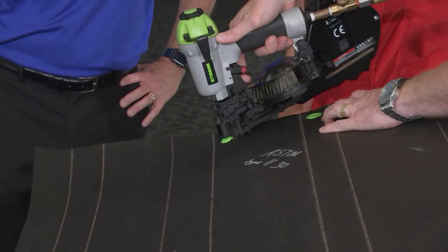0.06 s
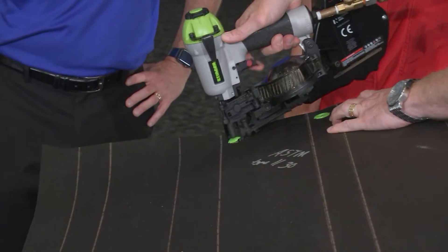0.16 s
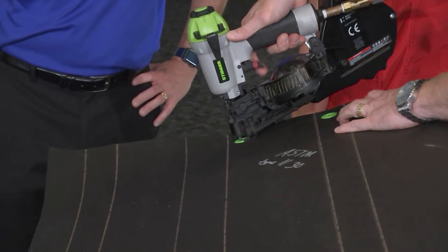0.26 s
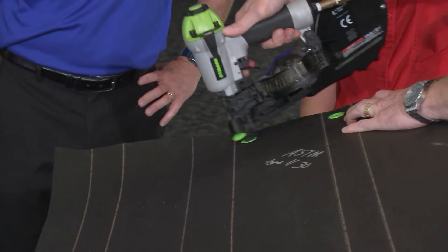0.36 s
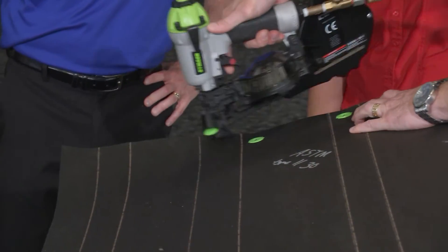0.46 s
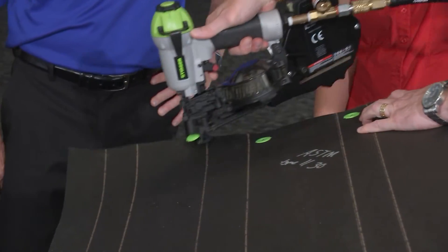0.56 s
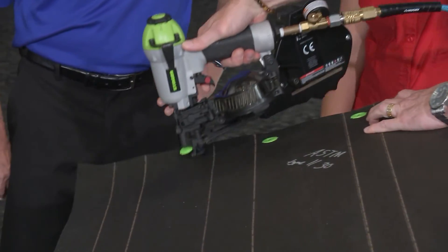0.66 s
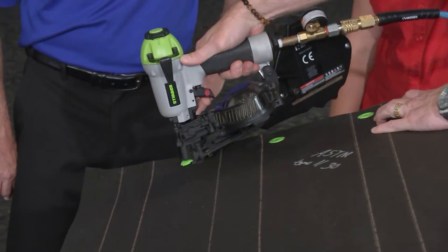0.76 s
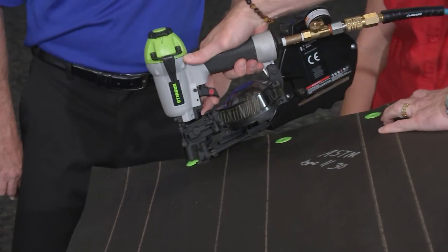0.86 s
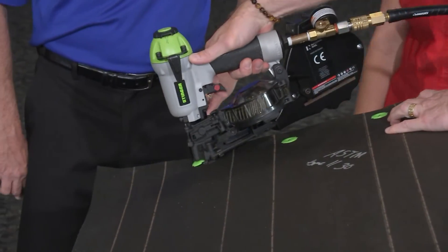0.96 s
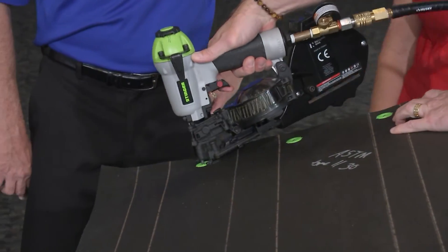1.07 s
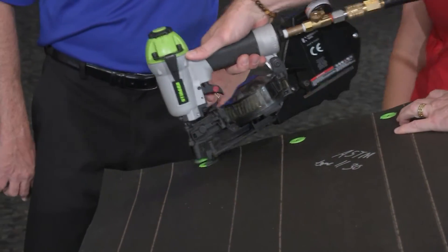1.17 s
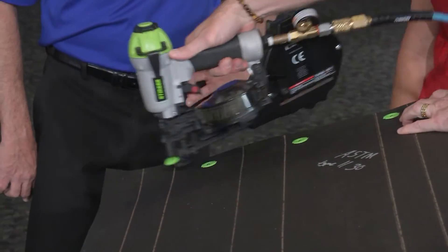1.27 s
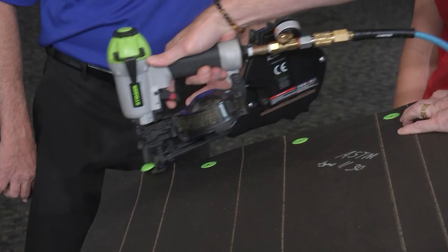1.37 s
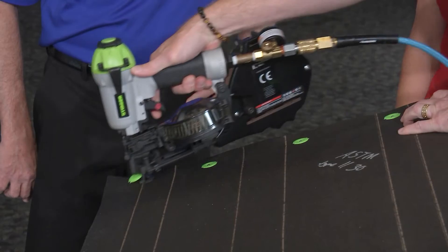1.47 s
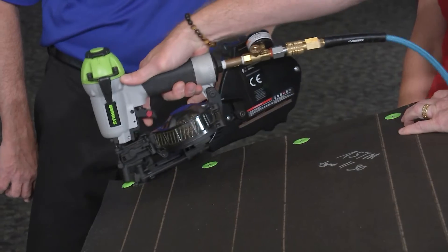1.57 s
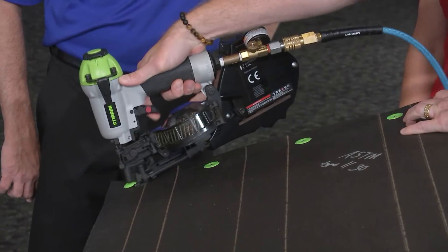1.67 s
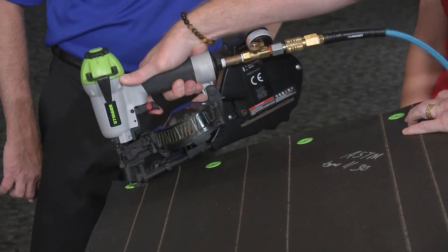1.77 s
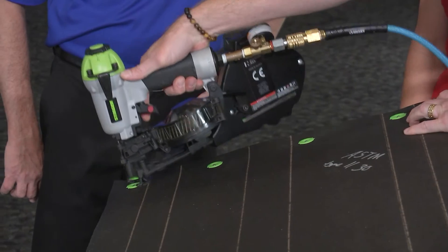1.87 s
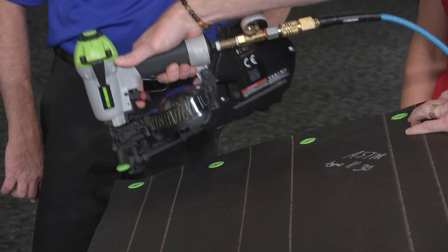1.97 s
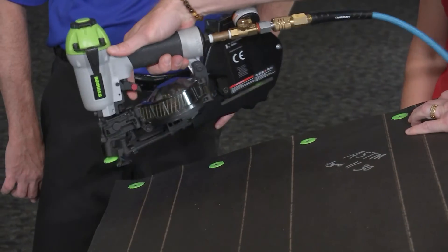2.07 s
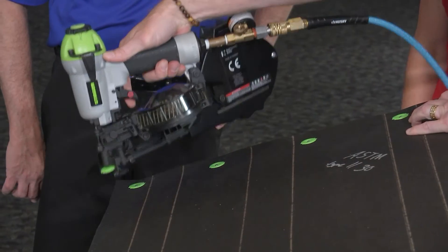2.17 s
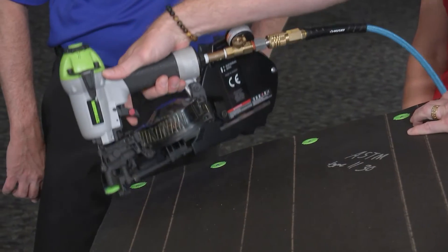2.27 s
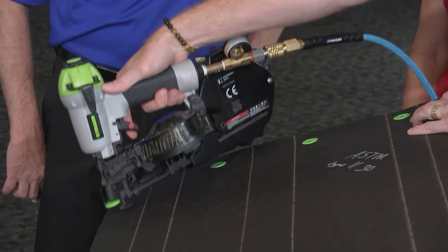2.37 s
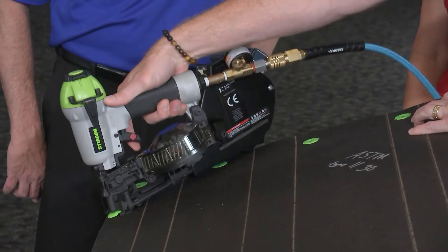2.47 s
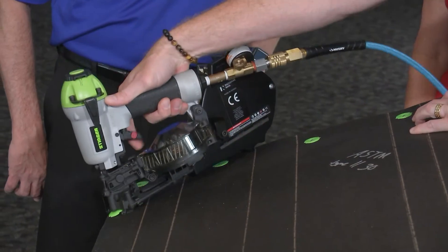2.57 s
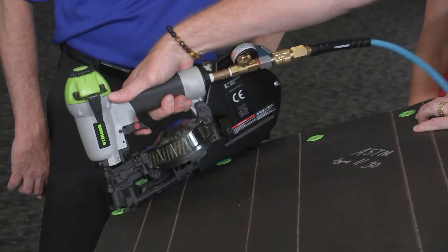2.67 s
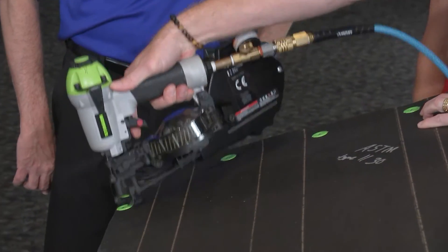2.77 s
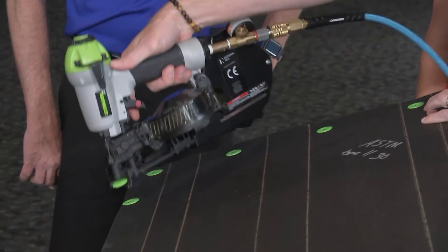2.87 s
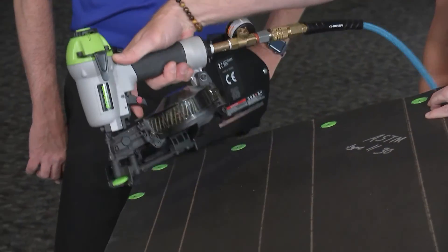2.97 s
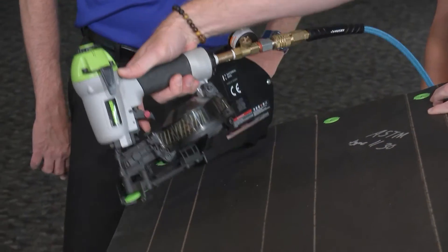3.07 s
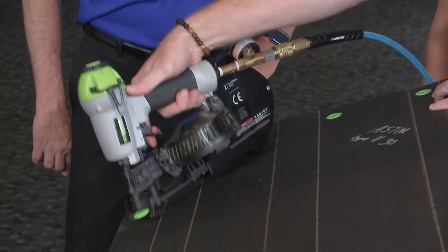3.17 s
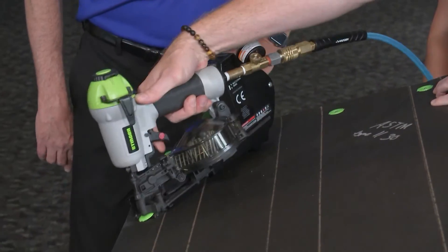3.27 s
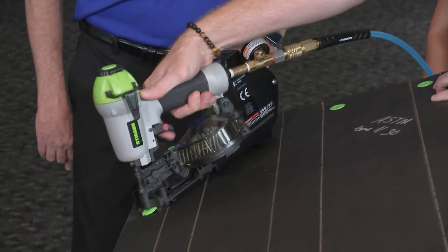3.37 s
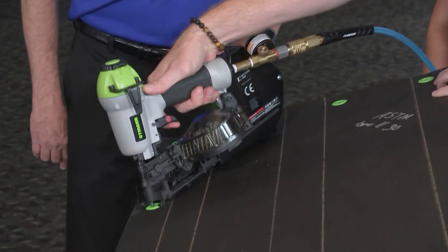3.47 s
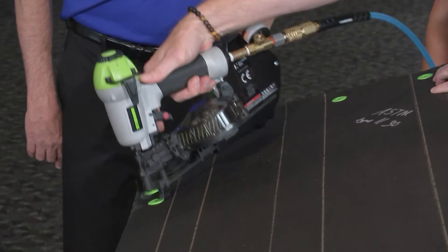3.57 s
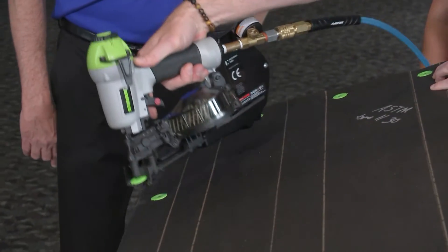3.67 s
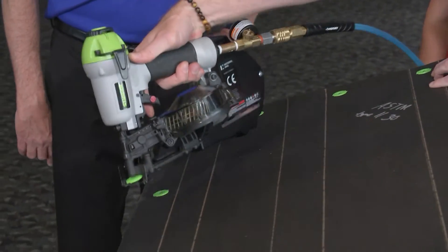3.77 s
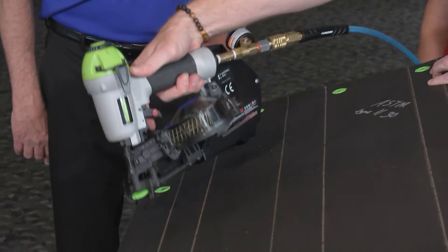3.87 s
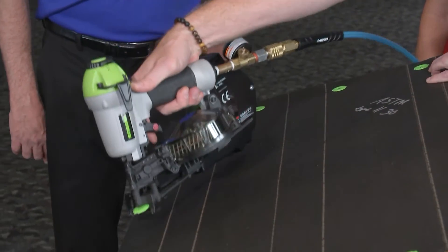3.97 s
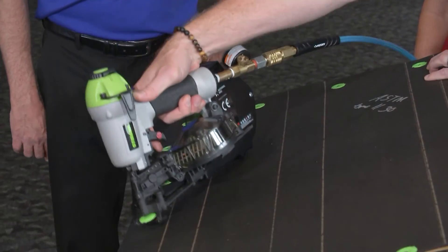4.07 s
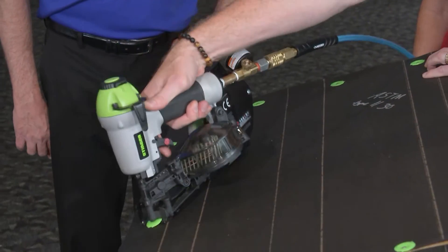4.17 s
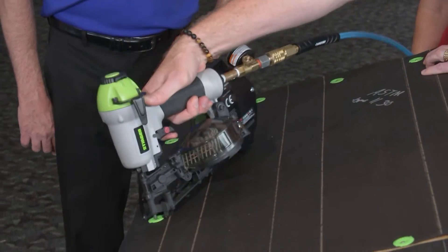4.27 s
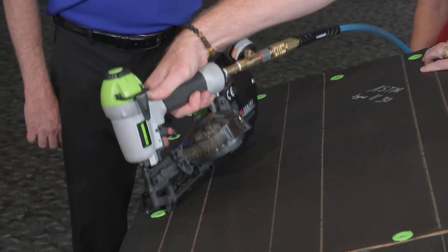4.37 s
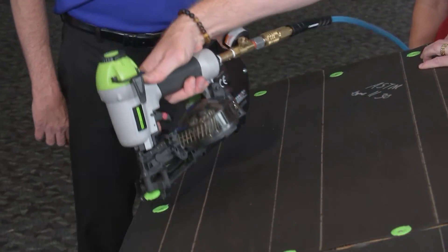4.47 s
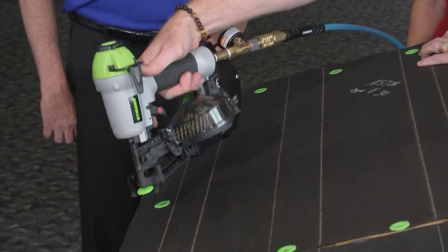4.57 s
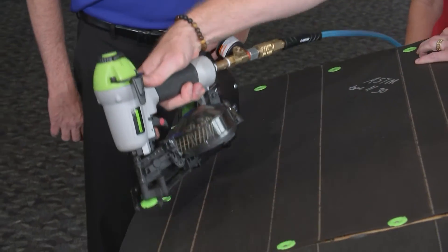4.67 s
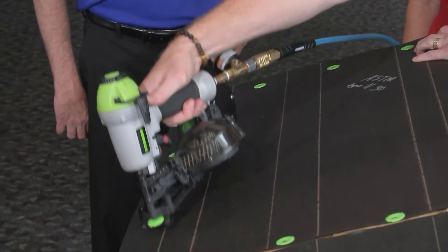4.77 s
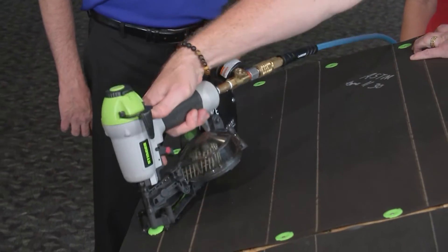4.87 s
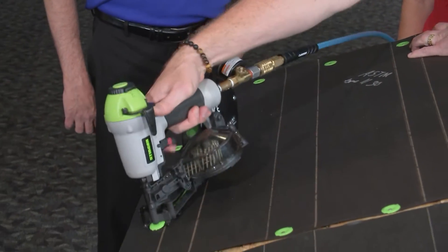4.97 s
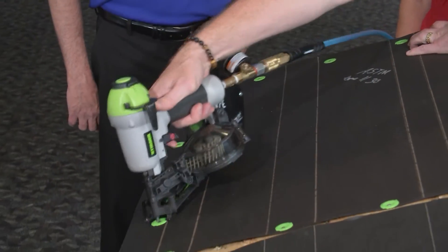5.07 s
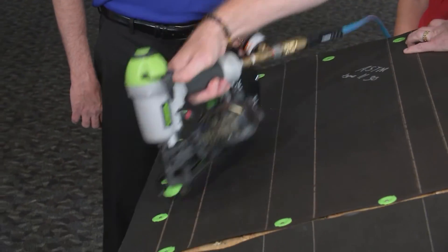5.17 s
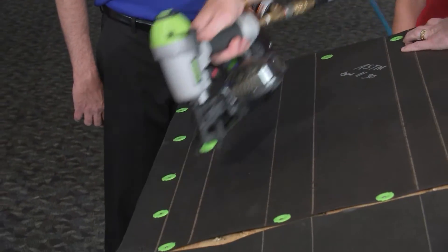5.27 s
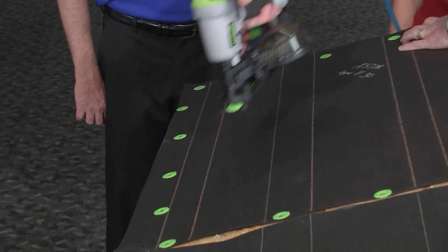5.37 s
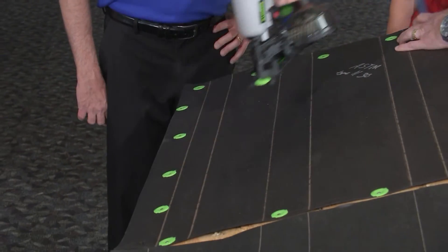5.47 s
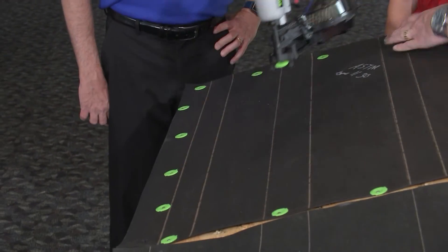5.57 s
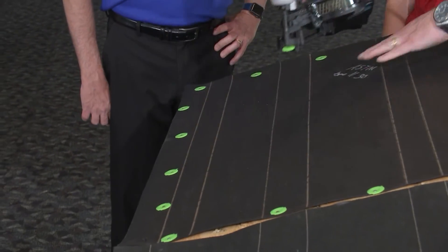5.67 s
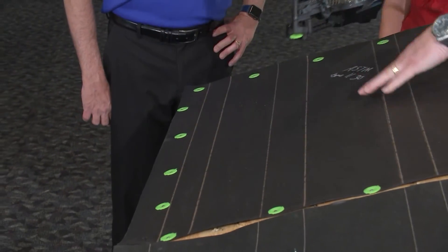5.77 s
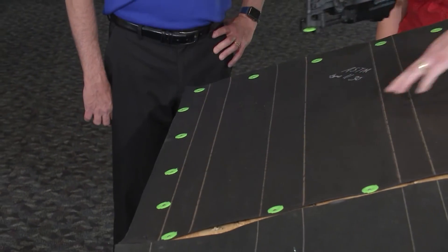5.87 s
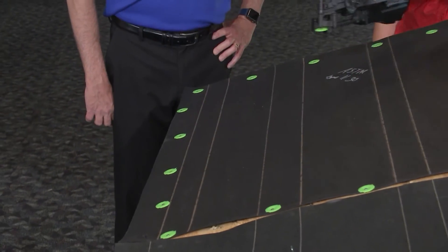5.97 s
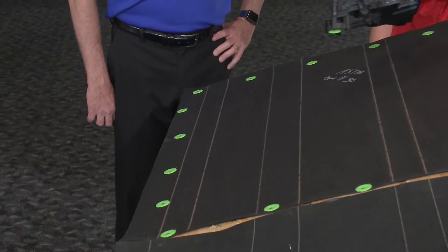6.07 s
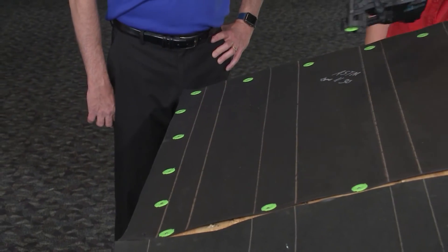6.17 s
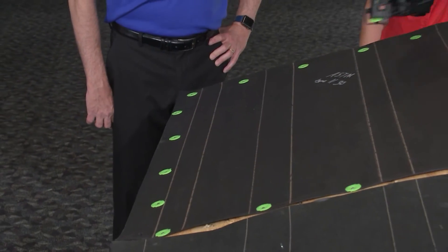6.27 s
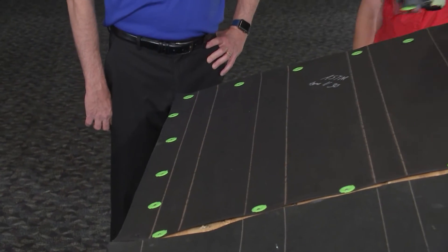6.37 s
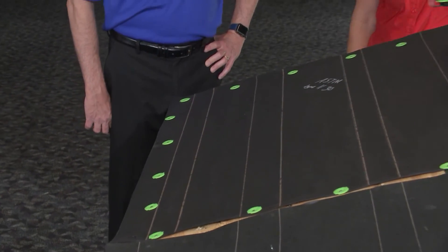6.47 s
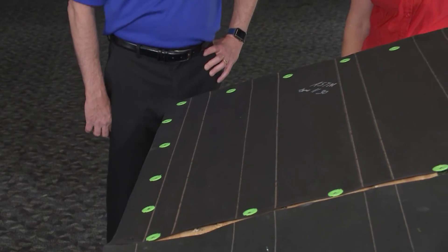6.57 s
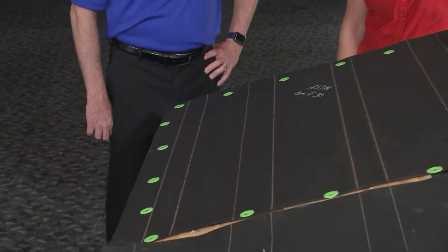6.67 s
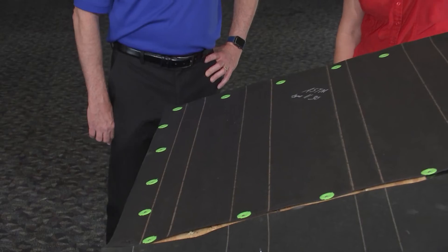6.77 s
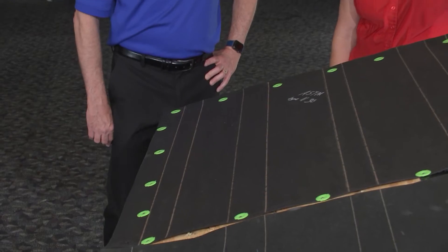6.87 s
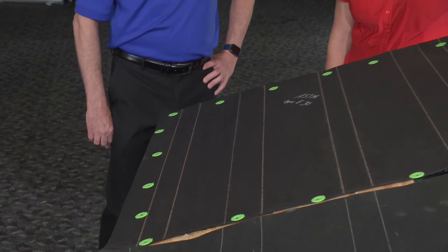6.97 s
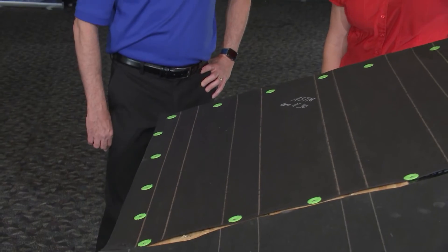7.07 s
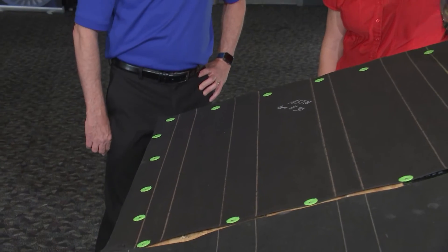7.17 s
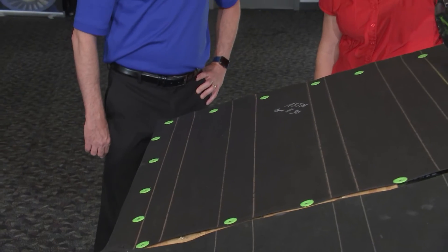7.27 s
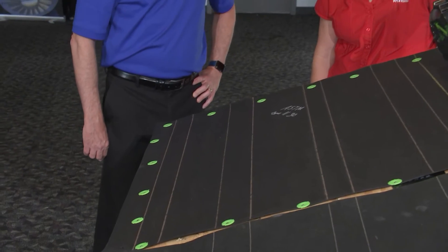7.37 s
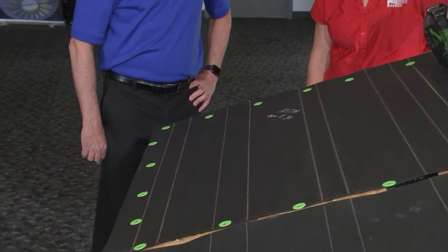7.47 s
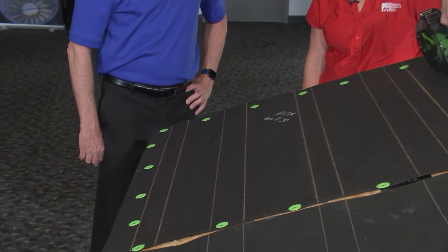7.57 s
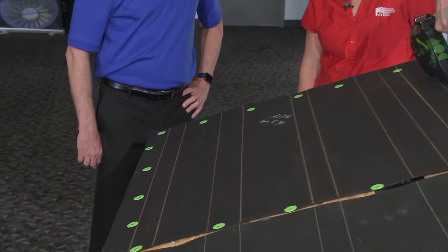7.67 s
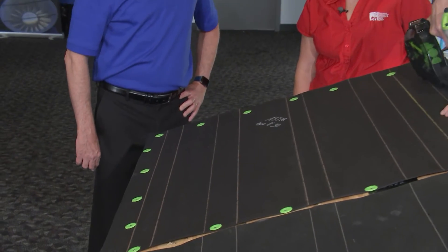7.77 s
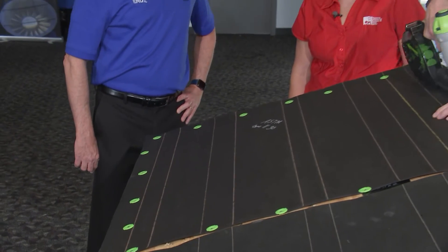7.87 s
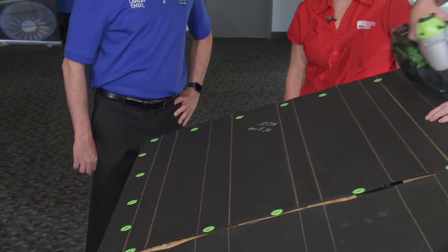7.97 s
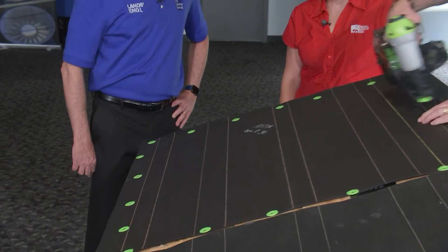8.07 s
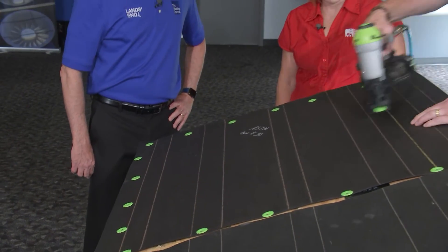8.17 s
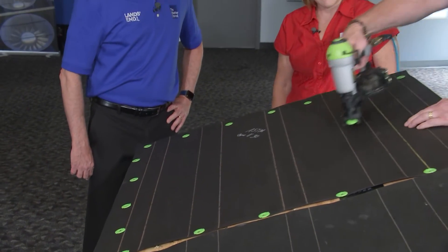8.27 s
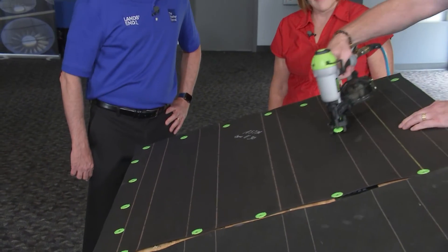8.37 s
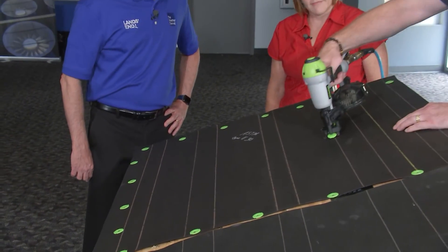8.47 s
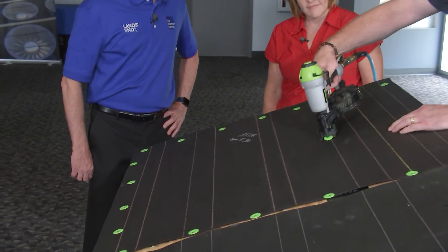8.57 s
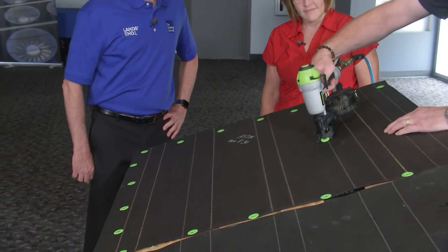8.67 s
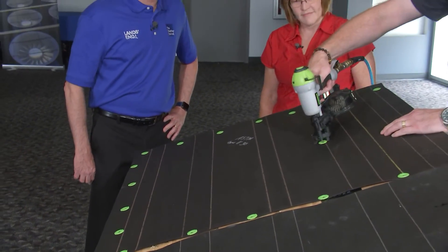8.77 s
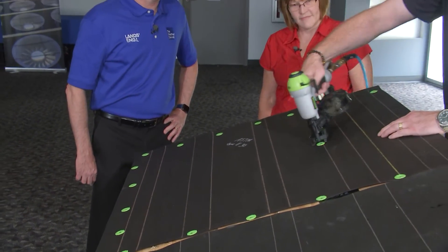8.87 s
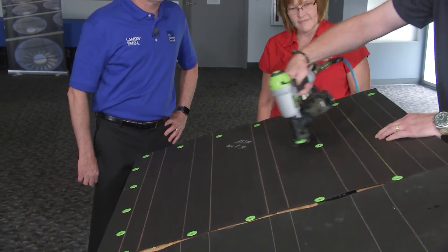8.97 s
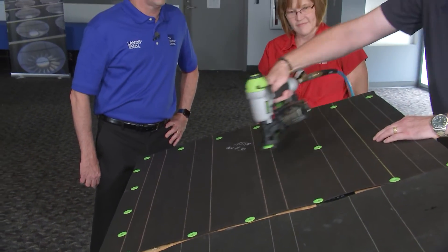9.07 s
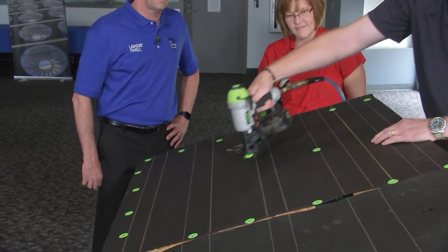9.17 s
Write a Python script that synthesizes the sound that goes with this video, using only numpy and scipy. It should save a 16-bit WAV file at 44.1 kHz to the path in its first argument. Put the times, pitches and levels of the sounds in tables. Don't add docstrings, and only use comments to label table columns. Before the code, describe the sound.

In an echoing hall, an air-powered nail gun knocks down, cracks out seven shots along a wooden sheet, pauses, then fires two more.

```python
import sys
import numpy as np
from scipy import signal
from scipy.fft import rfft, irfft
from scipy.io import wavfile
from scipy.ndimage import uniform_filter1d

SR = 44100
rng = np.random.default_rng(int(sys.argv[2]) if len(sys.argv) > 2 else 0)


def boost(x):
    u = np.asarray(x, float) / 20
    return 10 ** u


def master(y):
    cut = np.clip(np.atleast_2d(y).T, -1, 1)
    pcm = np.round(cut * 32767)
    wavfile.write(sys.argv[1], SR, pcm.astype(np.int16))


N = 407484

# pitch_hz, level_db per Hz
VENTILATION = [(14, -24), (36, -11), (65, -6.5), (97, -15.5), (134, -13.5), (228, -23.5), (703, -31.5),
               (1370, -40.5), (2100, -43), (2650, -52.5), (3400, -50), (5000, -57.5), (12000, -60.5),
               (13500, -83.5), (22000, -120)]

# start_s, knock_db, knock_hz, sheet_low_db, sheet_mid_db
LANDINGS = [(0.0, -32.5, 524, -27.5, -35), (.817, -30, 688, -38.5, -39.5), (.87, -41, 683, -42.5, -47),
            (1.629, -34, 532, -40.5, -47.5), (2.519, -31, 500, -32.5, -30), (4.147, -40.5, 523, -53, -39),
            (4.167, -31, 544, -37.5, -41), (4.207, -35, 463, -46, -40), (4.221, -35.5, 474, -40, -49),
            (4.245, -39, 463, -56, -53.5), (4.881, -35, 495, -29.5, -33), (4.893, -26, 595, -30.5, -33.5),
            (4.9075, -27.5, 575, -43.5, -43), (6.9435, -36, 558, -42, -46), (6.949, -36, 530, -44.5, -44.5),
            (7.021, -49, 480, -41, -45), (7.037, -48.5, 553, -53.5, -52.5), (7.697, -45, 525, -46, -60.5),
            (7.739, -37.5, 525, -58.5, -41), (8.802, -11.5, 519, -46, -20.5), (8.873, -28, 515, -54, -50)]
# start_s, knock_db, knock_hz
TAPS = [(0.704, -41, 648), (1.54, -47.5, 610), (2.397, -49, 557), (2.613, -38.5, 652), (3.196, -43, 523),
        (3.249, -44.5, 627), (3.3, -38.5, 540), (3.38, -39, 594), (4.992, -48.5, 511), (7.03, -47.5, 528),
        (7.366, -54.5, 554), (8.478, -46.5, 506), (8.645, -53.5, 510)]

# start_s, level_db, t60_s
LEVER = [(.0075, -40, 0.0099), (.022, -50, 0.018), (.029, -50, .02), (.054, -58, 0.016), (.065, -59, .015),
         (.806, -58, .02), (.888, -62, .02), (2.51, -46, .03), (2.628, -65, .012), (3.283, -42, 0.014),
         (3.317, -61, .015), (4.196, -42, .02), (4.862, -56, .02), (4.943, -56, .015), (5.015, -66, 0.014),
         (6.99, -58, .02), (7.03, -53, 0.018), (7.08, -67, .02), (.622, -52.5, .015), (.7864, -55.5, 0.022),
         (.799, -54, .02), (0.812, -40, 0.0083), (.8157, -32, 0.018), (.82, -46, .06), (.8409, -51, .02),
         (1.1176, -32.5, .02), (1.5385, -39, 0.026), (1.627, -38.5, 0.0085), (2.4746, -55, .022),
         (2.4802, -39, 0.019), (2.494, -42, 0.017), (3.2512, -35.5, 0.017), (3.26, -43, 0.027),
         (4.168, -35.5, .019), (4.175, -37, 0.023), (4.2453, -53.5, .02), (4.8688, -43.5, .026),
         (4.8746, -46.5, 0.064), (4.9329, -49, 0.018), (5.093, -37, .015), (5.58, -58, .03),
         (6.18, -74.5, .03), (6.35, -77.5, .06), (6.715, -72, .06), (6.745, -72, .06), (6.775, -74, .06),
         (6.87, -78, .04), (7.51, -72, .03), (6.9455, -38.5, 0.025), (6.949, -35.5, 0.022),
         (6.957, -45.5, .035), (7.0181, -64, .02), (7.446, -66.5, 0.017), (7.732, -56, 0.013),
         (8.497, -43.5, 0.03), (8.52, -54, 0.018), (8.7695, -36, 0.0065)]
# start_s, level_db, t60_s
COIL = [(.0019, -31.5, 0.019), (0.012, -32, 0.04), (0.052, -65, 0.026), (.109, -60.5, 0.02),
        (0.782, -45, 0.022), (.8671, -61, .018), (2.5178, -32, 0.017), (2.524, -47, .06), (2.533, -48, .04),
        (3.277, -43.5, 0.015), (3.2875, -47, 0.039), (3.3853, -45, 0.012), (4.156, -37.5, 0.03),
        (4.185, -45, .03), (4.1925, -43.5, 0.03), (4.201, -47, .02), (4.209, -35.5, 0.024),
        (4.2215, -44, .022), (4.865, -55, .025), (4.885, -45, 0.026), (4.89, -32, .018),
        (4.898, -30, 0.024), (4.905, -45, .02), (4.916, -38, .028), (4.993, -46, 0.022), (6.959, -48, 0.03),
        (7.047, -61, .015), (7.034, -50, 0.026), (7.039, -52, 0.025), (7.067, -53, 0.023),
        (7.3718, -51, .019), (7.6945, -50.5, 0.013), (7.702, -64, 0.022), (7.7388, -44, 0.012),
        (7.7446, -49, 0.069), (8.49, -44, 0.024)]
# pull_s, pull_db, release_ms before the exhaust, release_db
TRIGGER = [(0.1866, -52, 18, -26), (.9943, -69, 18, -24), (1.7087, -61, 18, -27), (2.6365, -50, 16, -27),
           (3.415, -51.5, 17.5, -26.5), (4.252, -55, 17, -25), (5.0057, -59, 17.5, -37),
           (7.823, -53, 14, -27), (8.7595, -53, 17.5, -28)]
# start_s, peak_db, pitch_hz, t60_s
PINGS = [(.002, -33, 7000, 0.023), (.086, -56, 4200, .015), (.109, -56, 4300, .03), (.782, -52, 5000, .03),
         (.8155, -40, 6300, .02), (.8155, -37, 9200, .02), (.828, -47, 4300, .04), (2.481, -52, 4100, .035),
         (2.483, -47, 7000, .03), (2.517, -35, 6800, .015), (3.251, -44, 7300, 0.028),
         (3.2765, -47, 6500, .015), (3.385, -49, 4800, .03), (4.1745, -43, 10200, 0.021),
         (4.187, -46, 6500, 0.03), (4.898, -40, 4900, .02), (4.933, -46.5, 10300, .015),
         (6.948, -47, 6900, 0.047), (6.957, -47, 14000, 0.055), (6.957, -46.5, 4900, .025),
         (6.972, -52.5, 7400, 0.027), (7.034, -55, 6800, .03), (7.066, -62, 10700, 0.045),
         (7.089, -61, 11000, 0.027), (7.089, -69, 4400, 0.092)]
# start_s,
# level_db, rise_s, t60_s
SCUFFS = [(.008, -44.5, 0.0053, 0.17), (.812, -50, .002, 0.055), (1.628, -64, .002, .04),
          (2.516, -46, 0.0016, 0.18), (3.38, -48, .002, .04), (4.153, -48.5, .003, 0.14),
          (4.207, -40, .002, .04), (4.852, -47.5, 0.028, 0.066), (4.887, -44, .002, 0.07),
          (4.99, -46, .002, 0.037), (5.098, -28.5, .002, 0.034), (7.738, -53, .002, 0.1)]

# head_valve_s, blow_s, exhaust_s, cap_feed_s
SHOTS = [
    (.2080, .2256, .3188, .4031),
    (1.0277, 1.0461, 1.1554, 1.2397),
    (1.7361, 1.7544, 1.8578, 1.9421),
    (2.6555, 2.6740, 2.7637, 2.8480),
    (3.4432, 3.4612, 3.5589, 3.6422),
    (4.2758, 4.2942, 4.3880, 4.4723),
    (5.0291, 5.0473, 5.1393, 5.2221),
    (7.8477, 7.8656, 7.9719, 8.0567),
    (8.7815, 8.7994, 8.8918, 8.9746),
]
HEAD_VALVE, BLOW, EXHAUST, CAP_FEED = range(4)
# inlet_db, vent_db, piston_return_db, cap_slider_db
AIR_LEVELS = [(-18, -23.5, -26, -20.5), (-18.5, -23, -25.5, -21), (-19, -25, -27, -22),
              (-21, -24.5, -25.5, -21), (-21, -24.5, -24, -21), (-22, -24, -24, -22.5),
              (-22.5, -24.5, -23, -21.5), (-18, -23, -22.5, -20.5), (-18.5, -23.5, -24, -20)]
# crack_db, thump_db, bumper_rattle_db
BLOWS = [(-11.5, -28.5, -22.5), (-16, -27.5, -22), (-10.5, -33, -20.5), (-11, -33, -22),
         (-11, -32.5, -20.5), (-9.5, -30, -18.5), (-11, -33.5, -18), (-10, -24, -18), (-15, -23, -22.5)]
CRACK_HZ = [1254, 1223, 1180, 1180, 1144, 1080, 1140, 1330, 1110]
TREBLE_DB = [-22.5, -23, -27, -21.5, -23, -25.5, -27, -26.5, -22]
# delay_ms after the blow, level_db re the blow
REBOUNDS = [(64, -15), (59.2, -5.5), (59.6, -6.5), (61.4, -14), (63.4, -9), (65.7, -7), (56.6, -22),
            (60.9, -11), (70.2, -12)]

# delay_ms, level_db, rise_ms, hold_ms, t60_ms
INLET_STROKES = [
    (-4.5, -8.5, 3, 1, 20),
    (-1, -4.5, 1.3, 1.5, 22),
    (-0.5, -11.5, 6, 3, 90),
]
VENT_STROKES = [
    (-4.5, 1.5, 3.2, 7, 60),
    (13, -2, 3, 4.9, 40),
    (26, -2.5, 1.5, 5, 76),
    (38.5, -9.5, 1.5, 5.5, 380),
    (47.5, -6, 2.5, 2, 30),
    (31.5, -22, 5.4, 5.5, 150),
]
RETURN_STROKES = [
    (25.4, -2, 1.5, 7.6, 70),
    (17, -14, 2.5, 5.5, 40),
    (49, -14, 2.4, 1.6, 27),
]
CLACK_STROKES = [
    (-3.5, -7.5, 1, .5, 12),
    (28, 0, 5.5, 1.8, 38),
    (51.5, -8, 2, 3, 25),
]
BUMPER_STROKES = [
    (-1.5, -4, 1.2, 0.5, 7),
    (1.7, 0.5, 1.4, 1.2, 15),
    (2, -11.5, 3, 3.8, 48),
    (10.5, -17.5, 4, 5.5, 380),
    (23, -17, 2, 4, 40),
]
TREBLE_STROKES = [
    (-1.9, -3, 1.2, .6, 8),
    (1.6, 1.5, 1.6, 1.2, 13),
    (23, -7, 1.5, 2.5, 40),
]
SNAP_STROKES = [
    (-0.9, -2.5, 1.59, 0.73, 11),
    (-4.5, -18, 3.2, .5, 50),
]

# pitch_hz, level_db per Hz
PUFF = [(800, -29), (2000, -22), (3500, -8), (5500, -2), (7000, 1), (12500, 4.5), (15300, 0.5),
        (16500, -16.5)]
HISS = [(1470, -38), (2500, -16.5), (3270, -16.5), (6010, -9), (7400, -2), (10300, 4), (12200, 3),
        (15700, -2), (16500, -30)]
RATTLE = [(900, -34), (1500, 0.5), (2300, 0), (3300, 0.5), (4660, -1), (5870, -2), (9000, -2.5),
          (11800, -0.5), (15400, -19)]
PISTON = [(500, -6), (1000, -8.5), (2000, -6.5), (4000, -11), (7500, -7), (10000, -29), (16000, -10)]
FEEDER = [(600, 1), (1500, -16), (2800, -7), (6000, -11), (11500, -1), (15500, -15), (16500, -15.5)]
METAL = [(1000, 2), (2000, -5.5), (4000, -4.5), (6500, -2), (9000, -12), (14000, -18.5)]
HOUSING = [(300, -17), (650, -10), (1000, 1.5), (1300, -3.5), (1900, -14), (3500, -31)]
FELT = [(400, -18.5), (900, -1), (1400, -5.5), (1800, -8.5), (3000, -12), (5000, -21)]

# pitch_hz, level_db, t60_s
VALVE = [(3050, -16.5, .008), (5025, -10.5, 0.009), (12300, -10, 0.0088)]
CYLINDER = [(920, -8, 0.011), (1230, -12.5, 0.013), (3820, -21, 0.023), (4420, -11.5, 0.012),
            (6600, -12, 0.037), (7630, -4, 0.012)]
SLIDER = [(2709, -13.5, 0.043), (5070, -14, 0.022), (7270, -5.5, 0.014), (9300, -14.5, .012),
          (11500, -7, 0.01)]

# pitch_hz, level_db, t60_s
SHEET = [(115.1, -6.5, 0.23), (146.4, -5.5, 0.22), (180, 4.5, 0.079), (209, -5, 0.063), (259.2, 0, 0.084),
         (323, -12, 0.12), (334, 0.5, 0.031), (441.5, 0, 0.028), (515, -2, 0.038), (585.6, 8, 0.018),
         (698, -2.5, 0.03), (760, -1, 0.013), (860, 1.5, 0.019), (965, -7, 0.037), (1200, -4, 0.024),
         (1436, -10, 0.063), (1900, -10, 0.017), (2237, -6, 0.021), (2970, -3, 0.0085)]
SHEET_BANDS_HZ = (0, 130, 210, 400, 650, 950, 9000)
SHEET_CHATTER = (0.57, 1.1, 1, 0.83, 0.66, 0.35)
BLOW_KICK = (0.49, 0.13, 0.33, 0.43, .6, 0.3)
TOUCH_KICK = (1, .7, 0.49, .6, .5, .5)
# deep_db, boom_db, low_db, mid_db, upper_db
SPOTS = [(-40.5, -28, -28.5, -35, -31), (-37.5, -31.5, -30, -33, -32), (-40.5, -35.5, -37, -32, -35.5),
         (-47.5, -38, -35, -32, -36), (-46, -43, -33, -32, -40.5), (-48.5, -41.5, -37, -31, -46.5),
         (-48.5, -41, -32.5, -36, -39.5), (-37, -34.5, -31.5, -31.5, -35.5), (-35.5, -29, -36, -42, -33.5)]
REBOUND_DB = (-4, -5, -1.5, -3.9, -0.1)
JOLT_DB = (-50, -45, -47, -53, -50.5, -54)
RAFTER_DB = [-1.4, -4.5, 6, -0.5, 0, 3.5, 8.5, -4, -3]
RAFTER_HZ = (295, 400)

# pitch_hz, t60_s, level_db
HALL = [(59.9, 0.83, -17.5), (122, 1.3, -3), (249, 0.94, -9), (463, 0.87, -4), (977, 1.5, -7),
        (2060, 0.68, -8), (3430, 0.74, -9), (6600, 0.96, -10), (8386, 0.98, -13.5), (13400, 0.69, -16),
        (16000, .35, -16)]
# pitch_hz, level_db
ANNEX = [(500, -19), (1500, -1), (2100, 2), (2700, 0), (3600, 2), (5500, -2), (9000, -22.5), (12000, -53.5)]
# delay_s, level_db
ECHOES = [
    (.0065, -24),
    (.03, -22),
]


def colour(x, points):
    hz, db = np.transpose(points)
    log_hz = np.log(np.linspace(1, SR / 2, 2049))
    gain_db = np.interp(log_hz, np.log(hz), db, left=db[0] - 20, right=db[-1] - 20)
    cepstrum = irfft(gain_db * np.log(10) / 20)
    cepstrum[1:2048] *= 2
    response = irfft(np.exp(rfft(cepstrum[:2049], 4096)))[:2048]
    response = response / np.sqrt(np.sum(response ** 2))
    return signal.oaconvolve(x, response)[:len(x)]


def add(out, s, sound):
    i = max(int(s * SR), 0)
    out[i:i + len(sound)] += sound[:max(len(out) - i, 0)]


def swell(rise_s, t60_s, hold_s=0.):
    t = np.arange(int(.4 * SR)) / SR
    fall_s = np.clip(t - rise_s - hold_s, 0, 1)
    return np.clip(t / rise_s, 0, 1) ** 2 * boost(-60 * fall_s / t60_s)


def ring(x, modes):
    hz, db, t60 = np.transpose(modes)[:, :, None]
    t = np.arange(2048) / SR
    partials = np.sin(2 * np.pi * hz * t) * boost(db - 60 * t / t60) / np.sqrt(t60 * SR / 28)
    return signal.oaconvolve(x, np.sum(partials, axis=0))[:len(x)]


def noisy(envelope, points, grain_db=0., modes=None):
    fine = uniform_filter1d(rng.standard_normal(N), size=24) * np.sqrt(24)
    gusts = uniform_filter1d(rng.standard_normal(N), size=110) * np.sqrt(110)
    grain = boost(grain_db * (fine + 0.34 * gusts))
    shake = envelope * grain * rng.standard_normal(N)
    out = colour(shake, points)
    if modes:
        out = out + ring(shake, modes)
    return out


def sheet(bands_db, push_s, chatter_s, kicks=TOUCH_KICK, rafter_db=0.):
    hz, db, t60 = np.transpose(SHEET)[:, :, None]
    detune, weight, sign = rng.standard_normal((3, len(SHEET), 1))
    t = np.arange(8192) / SR
    rings = np.sin(2 * np.pi * hz * (1 + .03 * detune) * t) * np.sign(sign)
    rings = rings * boost(db + 1.5 * weight - 60 * t / t60)
    rings = rings * (1 - np.exp(-2 * t * hz / 2))
    between_rafters = (hz > RAFTER_HZ[0]) * (hz < RAFTER_HZ[1])
    rings = rings * boost(rafter_db * between_rafters)
    shake = 0.061 * rng.standard_normal(len(t)) * np.clip(t / 0.014, 0, 1)
    out = 0
    bands = zip(SHEET_BANDS_HZ, SHEET_BANDS_HZ[1:], bands_db, SHEET_CHATTER, kicks)
    for low_hz, high_hz, band_db, share, kick in bands:
        force = shake * np.exp(-t / (share * chatter_s)) + kick * (t == 0)
        modes = np.sum(rings * (hz >= low_hz) * (hz < high_hz), axis=0)
        band = signal.oaconvolve(modes, force)
        out = out + boost(band_db) * band / np.std(band[:2048])
    push = np.hanning(max(int(push_s * SR), 3))
    return signal.oaconvolve(out, push / push.sum())


def staged(stage, level_db, strokes, colours, grain_db, modes=None):
    power = np.zeros(N)
    for lag_ms, stroke_db, rise_ms, hold_ms, t60_ms in strokes:
        envelope = swell(rise_ms / 1000, t60_ms / 1000, hold_ms / 1000)
        for shot, db in zip(SHOTS, level_db):
            add(power, shot[stage] + lag_ms / 1000, (boost(db + stroke_db) * envelope) ** 2)
    return noisy(np.sqrt(power), colours, grain_db, modes)


def ventilation():
    wander = uniform_filter1d(rng.standard_normal(N), size=8000) * 90
    rumble = colour(rng.standard_normal(N), VENTILATION) * boost(.6 * wander)
    return rumble * boost(-55) / np.std(rumble)


def thuds():
    out, t = np.zeros(N), np.arange(4096) / SR
    taps = [(s, db, hz, db - 12, db - 10.5) for s, db, hz in TAPS]
    for s, db, knock_hz, low_db, mid_db in sorted(LANDINGS + taps):
        pair = np.sin(2 * np.pi * knock_hz * t) + 0.11 * np.sin(2 * np.pi * 1.2 * knock_hz * t)
        knock = pair * np.clip(t / 0.0012, 0, 1) * np.exp(-t / 0.016)
        add(out, s - .002, boost(db - 4.5) * knock)
        bands_db = (low_db - 9.0, low_db - 9.0, mid_db - 10.5, db - 17.5, db - 24.5, db - 22.0)
        add(out, s, sheet(bands_db, .0004, 0.025))
    return out


def ticks():
    bright, dull = np.zeros(N), np.zeros(N)
    parts = [(s, db, db - 4.5, t60) for s, db, t60 in LEVER]
    parts += [(s, db - 7.5, db, t60) for s, db, t60 in COIL]
    for shot, (pull_s, pull_db, go_ms, go_db) in zip(SHOTS, TRIGGER):
        pull = (pull_s, pull_db)
        stem_seats = (pull_s + 0.0094, pull_db - 2)
        release = (shot[EXHAUST] - go_ms / 1000, go_db)
        for s, db in (pull, stem_seats, release):
            parts.append((s, db, db - 17.5, 0.012))
    for s, tick_db, clank_db, t60 in parts:
        tick = boost(-2.5) * swell(.001, np.clip(t60, .008, .06))
        add(bright, s - .0012, boost(tick_db) * tick)
        add(dull, s - .0012, boost(clank_db) * tick)
    return noisy(bright, HISS, 1.4) + noisy(boost(-2.5) * dull, METAL, 0.53)


def pings():
    out, t = np.zeros(N), np.arange(4096) / SR
    for (s, db, hz, t60), (apart, turn) in zip(PINGS, rng.random((len(PINGS), 2))):
        upper_hz = hz * (1.02 + .04 * apart)
        pair = np.sin(2 * np.pi * hz * t) + .6 * np.sin(2 * np.pi * (upper_hz * t + turn))
        add(out, s - .001, boost(db - 60 * t / t60) * pair * np.clip(t / .001, 0, 1))
    return out


def scuffs():
    flow = np.zeros(N)
    for s, db, rise_s, t60 in SCUFFS:
        add(flow, s, boost(db) * swell(rise_s, t60))
    return noisy(flow, FELT, 1.5)


def air():
    inlet_db, vent_db, return_db, snap_db = np.transpose(AIR_LEVELS)
    inlet = staged(HEAD_VALVE, inlet_db, INLET_STROKES, PUFF, 0.71, VALVE)
    vent = staged(EXHAUST, vent_db, VENT_STROKES, HISS, 1.5)
    piston = staged(EXHAUST, return_db - 5.5, RETURN_STROKES, PISTON, 2.6, CYLINDER)
    clack = staged(EXHAUST, return_db - 6, CLACK_STROKES, HOUSING, 1.5)
    snap = staged(CAP_FEED, snap_db - 2, SNAP_STROKES, FEEDER, 1.5, SLIDER)
    return inlet + vent + piston + clack + snap


def driver():
    out, t = np.zeros(N), np.arange(8192) / SR
    rise_s, fall_s = .0023, 0.00055
    kick = np.clip(t / rise_s, 0, 1) ** 1.5 * np.exp(-np.clip(t - rise_s, 0, 1) / fall_s)
    suck = boost(-11) * np.sin(np.pi * np.clip(t / rise_s, 0, 1))
    thump = np.sin(2 * np.pi * 33 * t) * np.exp(-t / 0.013) * np.clip(t / 0.0059, 0, 1)
    shots = zip(SHOTS, BLOWS, SPOTS, CRACK_HZ, REBOUNDS, RAFTER_DB)
    for shot, (db, thump_db, _), spot_db, crack_hz, (back_ms, back_db), rafter_db in shots:
        crack = np.cos(2 * np.pi * crack_hz * (t - rise_s)) * kick - suck
        add(out, shot[BLOW] - rise_s, boost(db) * crack + boost(thump_db) * thump)
        add(out, shot[BLOW], sheet((*spot_db, db - 22.0), .0002, 0.027, BLOW_KICK, rafter_db))
        fall_db = (*np.add(spot_db, REBOUND_DB), db - 30)
        add(out, shot[BLOW] + back_ms / 1000, boost(back_db) * sheet(fall_db, .001, .012))
        add(out, shot[EXHAUST] + 0.024, sheet(JOLT_DB, 0.00052, 0.0065))
    rattle_db = np.array(BLOWS)[:, -1]
    rattle = staged(BLOW, rattle_db, BUMPER_STROKES, RATTLE, 1.3)
    pawl = staged(BLOW, TREBLE_DB, TREBLE_STROKES, HISS, 1.4)
    return out + rattle + pawl


def diffuse(x):
    hz, _, sound = signal.stft(x, SR, nperseg=512)
    scatter = signal.stft(rng.standard_normal(N), SR, nperseg=512)[2]
    log_hz = np.log(hz + 1)

    def on_log(points, column):
        table = np.array(points)
        return np.interp(log_hz, np.log(table[:, 0]), table[:, column])

    treble = np.interp(log_hz, np.log([HALL[3][0], HALL[4][0]]), [0, 1])[:, None]
    power = uniform_filter1d(treble * np.abs(sound) ** 2, size=13, axis=0)
    t60 = np.array([on_log(HALL, 1), 2.01 + 0 * hz])
    level_db = np.array([on_log(HALL, 2), on_log(ANNEX, 1) - 11.5])
    keep = boost(-120 * 256 / SR / t60)
    feed = (1 - keep) * boost(level_db) ** 2
    held, heard = 0, np.zeros(power.shape)
    for k in range(power.shape[1] - 2):
        held = keep * held + feed * power[:, k]
        heard[:, k + 2] = held.sum(axis=0)
    return signal.istft(np.sqrt(heard) * scatter / np.std(scatter), SR, nperseg=512)[1][:N]


def hall(x):
    t = np.arange(int(1.8 * SR)) / SR
    log_hz = np.log(np.linspace(1, SR / 2, len(t) // 2 + 1))
    centres = np.log(np.array(HALL)[:, 0])
    tail = np.zeros(len(t))
    for k, (_, t60, db) in enumerate(HALL[:4]):
        share = np.interp(log_hz, centres, np.eye(len(HALL))[k])
        band = irfft(rfft(rng.standard_normal(len(t))) * np.sqrt(share))
        tail += boost(db) * band * boost(-60 * t / t60) / np.sqrt(t60 * SR / 14)
    tail *= np.clip(t / 0.014, 0, 1)
    for s, db in ECHOES:
        tail[int(s * SR)] += boost(db)
    return signal.oaconvolve(x, tail)[:N] + diffuse(x)


def scene():
    handling = thuds() + ticks() + pings() + scuffs()
    shots = air() + driver()
    reverberant = hall(shots + boost(-2.5) * handling)
    return (shots + handling + reverberant + ventilation())[None]


def band_limit(x):
    return signal.sosfilt(signal.butter(12, 16990, fs=SR, output="sos"), x)


def record(dry):
    top = signal.ellip(6, .3, 22, 15800, fs=SR, output="sos")
    mix = signal.sosfilt(top, dry)
    return band_limit(mix)


dry = scene()
out = record(dry)
master(out)
```